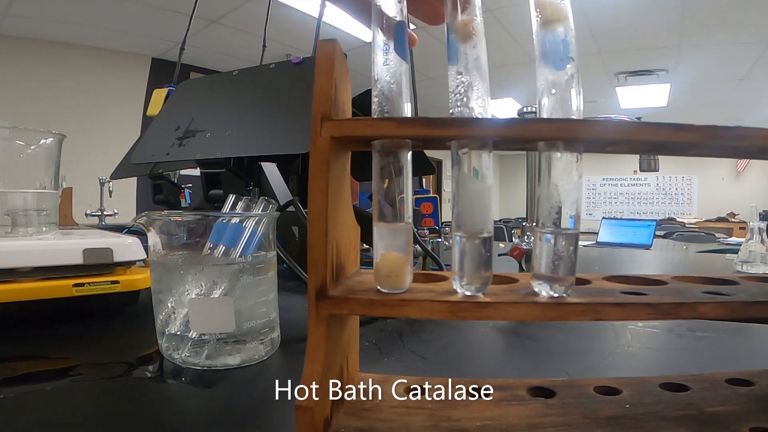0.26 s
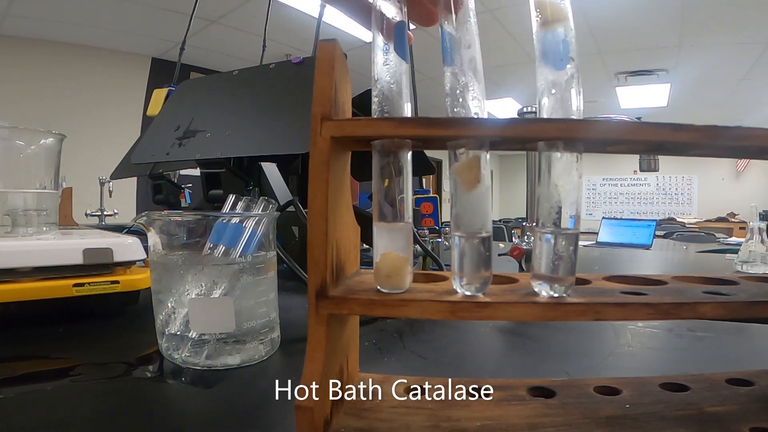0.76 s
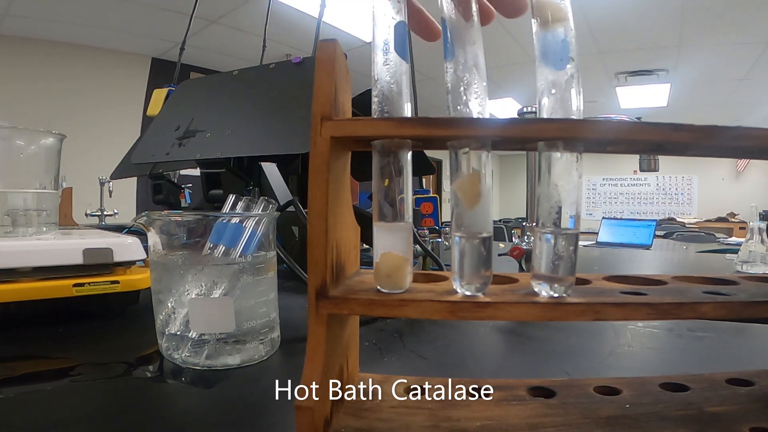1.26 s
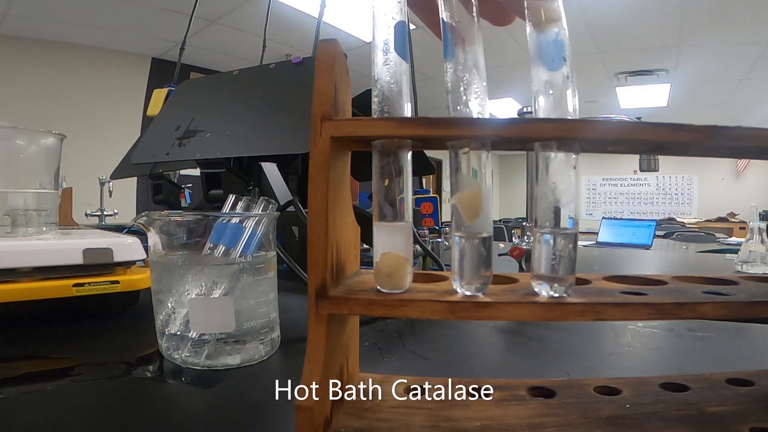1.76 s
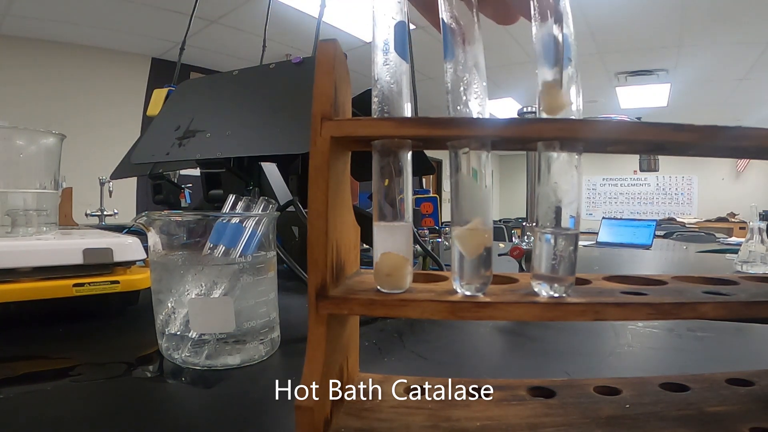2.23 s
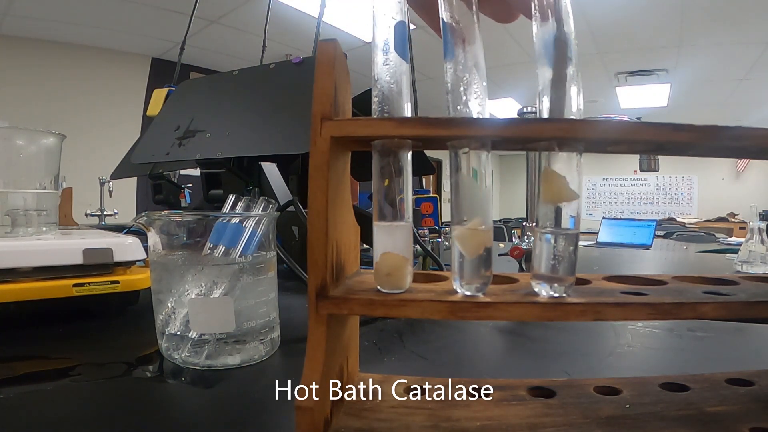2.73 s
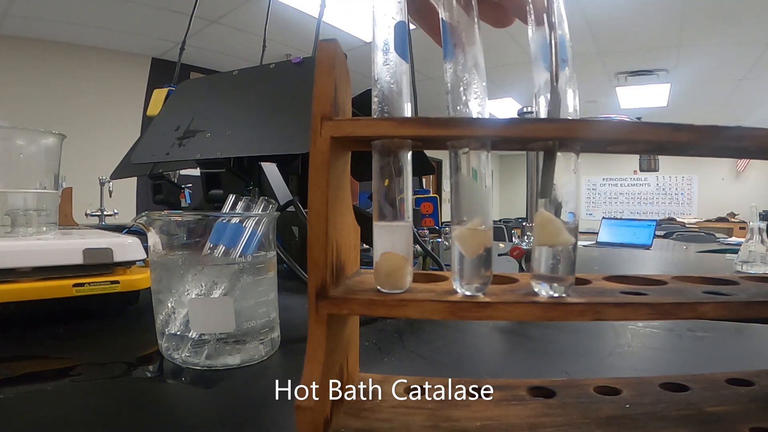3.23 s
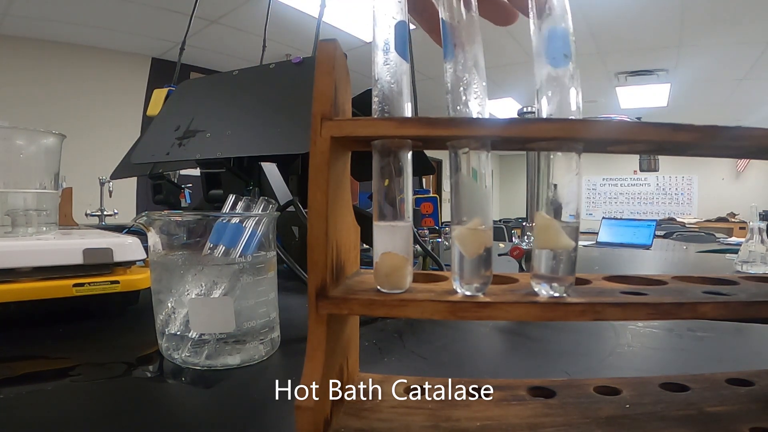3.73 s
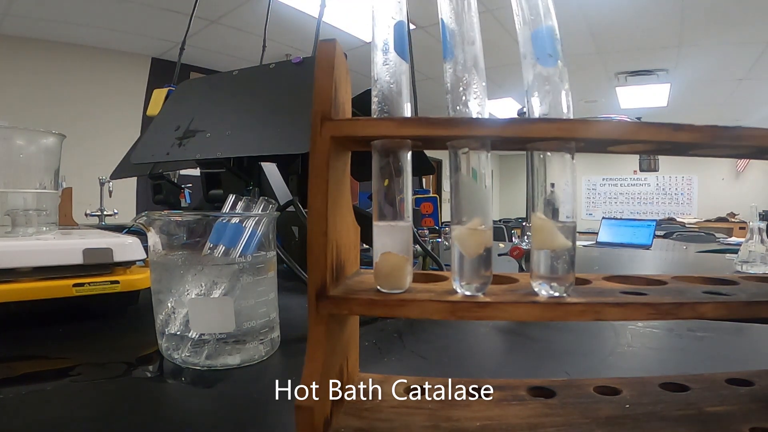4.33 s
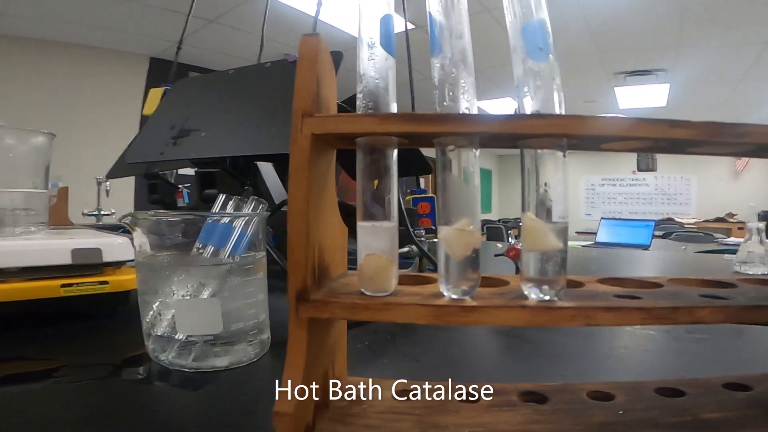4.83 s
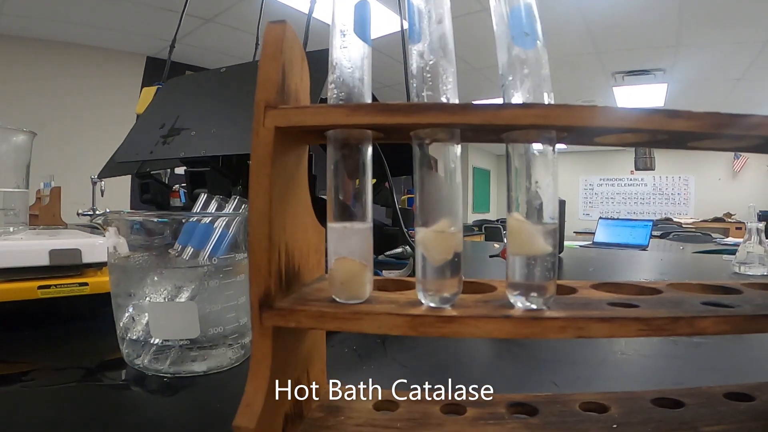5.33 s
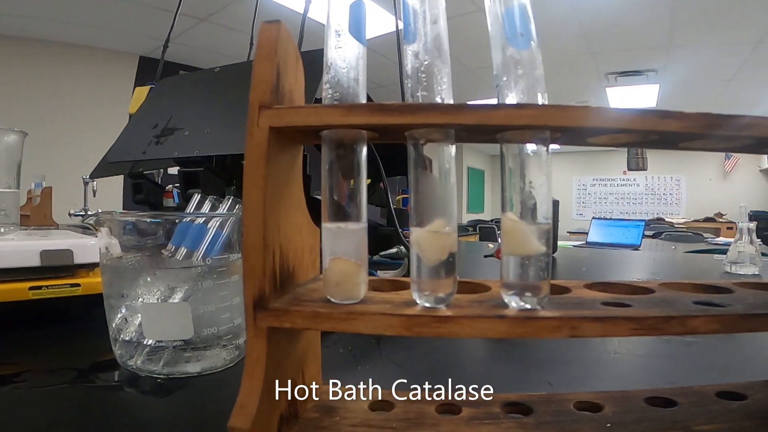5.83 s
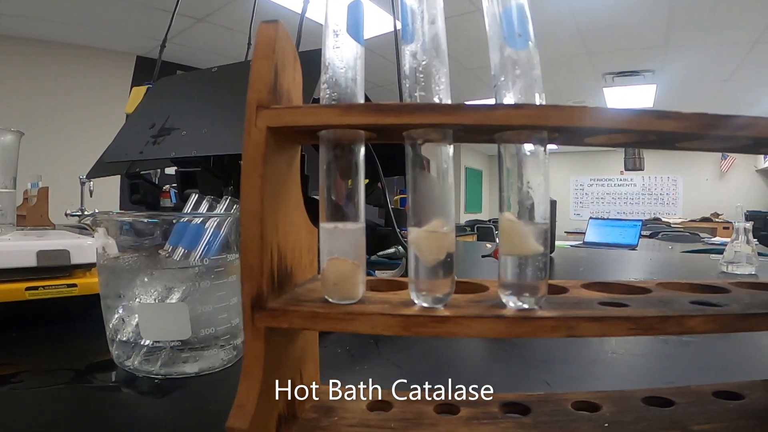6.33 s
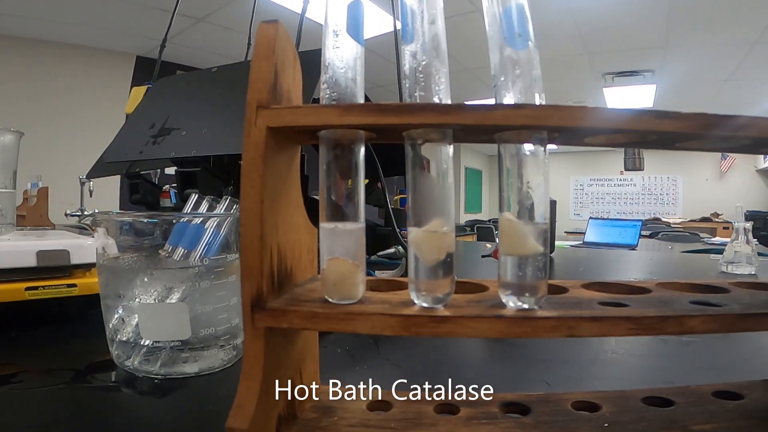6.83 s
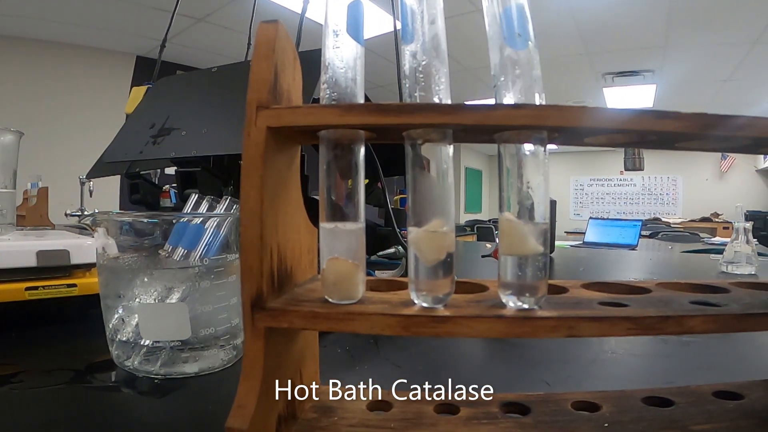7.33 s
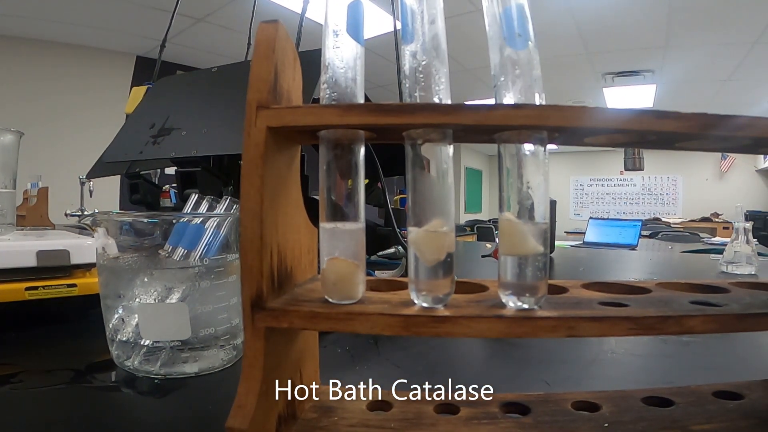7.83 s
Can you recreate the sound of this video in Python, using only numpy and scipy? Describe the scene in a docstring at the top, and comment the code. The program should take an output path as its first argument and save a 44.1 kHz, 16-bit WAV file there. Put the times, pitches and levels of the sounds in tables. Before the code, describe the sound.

Over the low, steady ventilation hum of a quiet classroom, a glass rod taps and scrapes in test tubes near the microphone, with a few louder knocks of a tube against its wooden rack. Past the middle, the microphone's stand judders briefly across the bench and thumps to a stop. The sound narrows to almost mono as the rod settles on the bench with light, ringing taps.

```python
"""A rod clicks and scrapes inside glass test tubes as it pushes small pieces down.
Each touch makes the glass ring briefly, and a tube knocks in its seat in the wooden rack.
The microphone's stand is shoved over the bench and the stereo image closes up; then the rod
is laid down, bouncing with a thin ring. Ventilation hums in the quiet classroom throughout."""
import sys
import numpy as np
from scipy import signal
from scipy.fft import rfft, irfft, next_fast_len
from scipy.io import wavfile

SR = 44100
rng = np.random.default_rng(int(sys.argv[2]) if len(sys.argv) > 2 else 0)


def file_out(sig):
    """Save sig as 16-bit WAV at sys.argv[1]."""
    # one column per channel
    cols = np.atleast_2d(sig).T
    # limit, then scale
    lim = np.clip(cols, -1, 1)
    pcm = np.round(lim * 32767).astype(np.int16)
    wavfile.write(sys.argv[1], SR, pcm)


N = 356328
TIME = np.arange(N) / SR
FIRM_CLICK_DB = -35

# The rod hits a held tube. Each row: start in seconds, level in dB, hardness in dB, favoured pitch in Hz.
ROD_CLICKS = [(0.22, -53, 10, 4330), (0.2952, -26.0, -1.5, 4280), (0.3844, -32.5, 1.5, 4740),
              (0.501, -55, -5, 4600), (0.548, -40.5, -4.5, 3020), (0.6453, -32, 8, 4300),
              (0.687, -36.5, 4, 3630), (0.7332, -27.0, -3.5, 3350), (0.744, -23.5, 3, 4700),
              (0.7962, -35.5, -12, 3360), (0.802, -39, 9, 4230), (0.92, -37, -4, 2800),
              (0.964, -34, 0.5, 3840), (0.978, -35, 2, 4100), (2.0997, -30, 0.5, 4470),
              (2.136, -38.5, -2, 4400), (2.1653, -29, 2, 4000), (2.2677, -26, -1, 3710),
              (2.2922, -25, 2, 4100), (2.3858, -36, -1, 3350), (2.899, -44, 2, 3740),
              (2.9561, -30, 5, 2990), (3.1838, -29, 4, 4650), (3.1984, -32, 8, 4370),
              (3.2492, -24.5, -4.5, 4660), (3.5508, -35, -5, 3320), (3.569, -30.5, -2, 3020),
              (3.8412, -32, -2.5, 4200), (3.872, -35.5, 10, 4300), (3.933, -40.5, -14, 4000),
              (3.9789, -26.5, 6, 3890), (4.6087, -46, -16, 1700), (4.6954, -39, 3, 6100)]
# The rod rubs down the glass. Each row: start and length in seconds, relative level in dB,
# added treble in dB, squeak pitch in Hz.
ROD_RUBS = [(0.75, 0.1, -62.5, 3.5, 4700), (0.926, 0.12, -57, 12.5, 3880), (2.303, 0.35, -60.5, -31, 3010),
            (2.712, 0.12, -52, -23, 3050), (2.861, 0.14, -54.5, 0, 3480), (3.253, 0.081, -48, -7, 3000),
            (3.619, 0.054, -58, -35, 2900), (3.732, 0.075, -44.5, 2, 2920), (3.842, 0.073, -48, 6, 2805),
            (3.92, 0.057, -44.5, 4, 3930)]
# The free rod's modes, the tones it rings with. Each row: pitch in Hz, relative level in dB,
# ring time in seconds (t60, the time to fade by 60 dB).
ROD_MODES = [(5890, -3.5, 0.26), (6600, -6, 0.15), (8210, -2.5, 0.13), (8500, -9, 0.092),
             (10180, -5.5, 0.2), (12200, -12.5, 0.2), (14200, -14, 0.14)]
# The bench top's modes. Each row: pitch in Hz, relative level in dB, ring time in seconds.
BENCH_MODES = [(614, -12, 0.054), (930, -6, 0.017), (2190, 0.5, 0.0081), (3470, -3, 0.0068)]


def from_db(db):
    """Turn decibels into a factor to multiply by."""
    return 10 ** (np.asarray(db) / 20)


def rms_one(x):
    """Scale a sound to an average strength (rms) of 1."""
    return x / np.sqrt(np.mean(x ** 2) + 1e-20)


def at_hz(curve, hz):
    """Read a curve between its listed frequencies."""
    known_hz, values = np.transpose(curve)
    return np.interp(np.log(hz + 1e-9), np.log(known_hz), values)


def add(out, s, sound):
    """Mix a sound in, starting at s seconds."""
    start = int(np.clip(round(s * SR), 0, N - 1))
    out[start:start + len(sound)] += sound[:N - start]


def shaped(x, curve, share=1):
    """Filter a sound by a share of a curve of dB against Hz."""
    size = next_fast_len(N)
    gain = from_db(share * at_hz(curve, np.fft.rfftfreq(size, 1 / SR)))
    return irfft(rfft(x, size) * gain, size)[..., :N]


def coloured(x, spectrum):
    """Give a noise its tone colour, falling steeply past both ends, at strength 1."""
    size = next_fast_len(N)
    hz = np.fft.rfftfreq(size, 1 / SR) + 0.00068
    ends = np.minimum(1, hz / spectrum[0][0]) ** 4 * np.minimum(1, spectrum[-1][0] / hz) ** 4
    return rms_one(irfft(rfft(x, size) * from_db(at_hz(spectrum, hz)) * ends, size)[..., :N])


def leaning(pair, balance):
    """Tip each frequency to the left or right."""
    return shaped(pair, balance, share=np.array([[.5], [-.5]]))


def resonance(x, hz, width_hz):
    """Keep what lies around one pitch."""
    return signal.lfilter(*signal.iirpeak(hz, hz / width_hz, fs=SR), x)


def radiated(x):
    """Thin tubes give off no bass."""
    return signal.sosfilt(signal.butter(2, 1100, "high", fs=SR, output="sos"), x)


def drift(per_s):
    """Wander to a new random value per_s times a second."""
    values = rng.standard_normal(N // 20)
    return np.interp(TIME * per_s, np.arange(len(values)), values)


def stroke(s, length, edge=.25):
    """A push swells, holds and lets go; rise and fall each take the share given by edge."""
    out = np.zeros(N)
    progress = TIME[:int(length * SR)] / length
    ramp = np.clip(np.minimum(progress, 1 - progress) / edge, 0, 1)
    add(out, s, np.sin(np.pi / 2 * ramp))
    return out


def crackle(spectrum, per_s, spread_db, cycles, clump_db, bands=22):
    """Tiny slips of uneven size come in clumps; each rings for a few cycles at its own pitch."""
    sizes = from_db(spread_db * np.minimum(rng.exponential(1, N), 4)) * rng.choice([-1, 1], N)
    slips = sizes * (rng.random(N) < per_s / SR) * from_db(clump_db * drift(110))
    band_of_slip = rng.integers(0, bands, N)
    out = 0
    for k, hz in enumerate(np.geomspace(spectrum[0][0], spectrum[-1][0], bands)):
        out += resonance(slips * (band_of_slip == k) + 1e-18, hz, hz / cycles)
    return coloured(out, spectrum)


def strike(modes, vary_db, detune, tilt_db=0):
    """One blow: the point of contact gives every mode its own strength, sign and slight mistuning."""
    hz, db, t60 = np.transpose(modes)
    t = TIME[:int(1.5 * SR * t60.max())]
    strength, sign, mistuning = rng.standard_normal((3, len(hz)))
    gain = from_db(db + vary_db * strength)
    gain = gain / np.linalg.norm(gain) * np.sign(sign) * from_db(tilt_db)
    tones = np.sin(2 * np.pi * np.outer(hz * (1 + detune * mistuning), t))
    fades = 1000. ** -np.outer(1 / t60, t)
    return gain @ (tones * fades)


def ventilation():
    """Air rumbles in the ducts and hisses softly while a motor hums and wavers."""
    # Tone colours of the moving air. Each row: frequency in Hz, relative level in dB.
    rumble_colour = [(22, -1.5), (80, -3.5), (112, 5), (160, -4.5), (200, -2), (330, -8.5), (450, -15.5),
                     (650, -20.5), (900, -42.5)]
    hiss_colour = [(750, -19), (900, -9), (1180, -3), (1600, -4), (2970, -13.5), (3490, -10), (4190, -19.5),
                   (5500, -21.5), (8330, -27.5), (15000, -51.5)]
    # Stereo width, least in the bass. Each row: frequency in Hz, side level over centre level in dB.
    air_width = [(60, -30), (250, -18.5), (1600, -2.5), (10000, 1.5)]
    # The air's lean. Each row: frequency in Hz, left over right in dB.
    air_balance = [(200, 0), (1600, 5.5), (4000, 6), (10000, 0)]
    # The motor's tones. Each row: pitch in Hz, level in dB.
    motor_tones = [(119, -50.5), (203, -55), (241, -56), (479, -63)]
    out = np.zeros((2, N))
    for db, colour in (-41.5, rumble_colour), (-60.5, hiss_colour):
        centre, side = rng.standard_normal((2, N))
        air = leaning(centre + shaped(side, air_width) * [[1], [-1]], air_balance)
        out += from_db(db) * coloured(air, colour)
    for hz, db in motor_tones:
        level = from_db(db + 0.67 * drift(19)) * np.sqrt(2)
        out += level * np.sin(2 * np.pi * hz * TIME + 0.99 * drift(6))
    return out


def whine(hz=8000, db=-83, pulses_per_s=17.37, pulse_s=.016):
    """A faint high tone pulses quickly, as from some electronics."""
    progress = (TIME * pulses_per_s % 1) / (pulses_per_s * pulse_s)
    pulses = np.sin(np.pi * np.minimum(progress, 1))
    tone = np.sin(2 * np.pi * hz * TIME + 2 * drift(400))
    return from_db(db) * np.sqrt(2) * pulses * tone


def tube_clicks(events, focus_db=6, focus_octaves=0.23, bounce_db=-6):
    """The rod hits the glass: soft touches stir the low modes, hard ones the high modes."""
    # The tube wall, damped by fingers. Each row: pitch in Hz, relative level in dB, ring time in seconds.
    tube_modes = [(1700, -2, 0.025), (2137, -1.5, 0.02), (2985, -5, 0.032), (3340, -4.5, 0.0197),
                  (3840, -7.5, 0.018), (4100, 1, 0.011), (4650, 4, 0.013), (5453, -3, 0.026),
                  (6170, -5, 0.019), (7200, -1, 0.0078), (8760, -4.5, 0.0105), (10330, -7, 0.018),
                  (12700, -13.5, 0.014)]
    hz, mode_db, t60 = np.transpose(tube_modes)
    out = np.zeros(N)
    for s, db, hardness, focus_hz in events:
        lightness_db = 0.28 * (FIRM_CLICK_DB - db)   # lighter clicks favour both ends of the range
        low_db = -3.5 + lightness_db - hardness
        high_db = 4 + lightness_db + hardness
        tilt = at_hz([(2000, low_db), (3000, 0), (5500, 0), (11500, high_db)], hz)
        # Modes near the favoured pitch grow louder and are drawn towards it.
        near = np.exp(-(np.log2(hz / focus_hz) / focus_octaves) ** 2)
        favoured = np.transpose([hz + (focus_hz - hz) * near / 2, mode_db + focus_db * near, t60])
        click = np.zeros(SR // 2)
        bounce_times = np.cumsum(rng.uniform(.0006, .002, 2))
        for k, delay in enumerate([0, *bounce_times]):
            ring = strike(favoured, vary_db=2.5, detune=0.047, tilt_db=tilt)
            add(click, delay, from_db(k * bounce_db) * ring)
        # Set the level as if all the click's energy fell within 10 ms.
        add(out, s, from_db(db) * click / np.linalg.norm(click) * np.sqrt(SR / 100))
    return radiated(out)


def rubbing(ring_db=9, skid_t60=0.16):
    """The wet rod sticks and slips on the glass, in a skid after each click and in squeaky strokes."""
    # Tone colours of the rub, and of the treble a dry, hard rub adds.
    # Each row: frequency in Hz, relative level in dB.
    rub_colour = [(750, -5.5), (1200, -3.5), (2000, -8), (3000, -7), (6700, -11.5), (15000, -33)]
    hiss_colour = [(3000, -26), (8000, -3.5), (10600, 7.5), (15000, -2)]
    # The tube's resonances under the sliding rod. Each row: pitch in Hz, width in Hz.
    tube_rings = [(2250, 100), (3380, 150), (4300, 240)]
    slips = crackle(rub_colour, per_s=8000, spread_db=3, cycles=18, clump_db=2.5)
    ringing = sum(resonance(slips, hz, width) for hz, width in tube_rings)
    scrape = rms_one(slips + from_db(ring_db) * ringing)
    treble = shaped(scrape, hiss_colour)
    skids = np.zeros(N)
    for s, db, *_ in ROD_CLICKS:
        skid_db = -52.5 + 0.4 * (db - FIRM_CLICK_DB)   # firmer clicks skid louder
        add(skids, s, from_db(skid_db - 60 * TIME[:SR // 2] / skid_t60))
    out = skids * scrape
    for s, length, db, treble_db, hz in ROD_RUBS:
        squeak = from_db(-0.5) * rms_one(resonance(slips, hz, width_hz=150))
        out += from_db(db) * stroke(s, length, edge=.27) * (scrape + squeak + from_db(treble_db) * treble)
    return out


def pings():
    """Single tones ring on after some blows: tube clinks, the stand's knock and the rod's landing."""
    # Each row: start in seconds, level in dB, pitch in Hz, ring time in seconds.
    lone_tones = [(0.745, -20.5, 12200, 0.028), (3.9781, -17, 3936, 0.073), (3.9787, -49, 6610, 0.25),
                  (5.031, -23.5, 800, 0.05), (5.702, -39, 9297, 0.24), (5.703, -37, 12200, 0.14),
                  (6.448, -42, 5370, 0.15)]
    out = np.zeros(N)
    for s, db, hz, t60 in lone_tones:
        add(out, s, from_db(db) * strike([(hz, 0, t60)], vary_db=0, detune=0))
    return out


def catches(per_s=36):
    """List small clicks where the rubbing rod catches at random; they follow the rub's level and treble."""
    return [(s + length * rng.uniform(.1, .9), db + 1.5 + rng.normal(0, 2), treble_db / 2, hz)
            for s, length, db, treble_db, hz in ROD_RUBS for _ in range(int(length * per_s))]


def seat_knocks(grip_after_s=0.00534, grip_t60=0.026, bounce_db=-11, thump_db=-8):
    """A tube chatters and rings for a few milliseconds, then the wooden rack grips it with a thump."""
    # The tube's knocks. Each row: start in seconds, level in dB, hardness in dB.
    knocks = [(1.482, -16.5, 8), (1.8215, -21.5, -1), (1.9621, -14.5, -0.5)]
    # Modes of the seated tube and of the rack.
    # Each row: pitch in Hz, relative level in dB, ring time in seconds.
    seat_modes = [(1600, -1, 0.12), (1642, -6.5, 0.038), (2156, -6.5, 0.13), (3000, -12.5, 0.013),
                  (3710, -8, 0.015), (4200, 3.5, 0.0063), (4700, -7.5, 0.0058), (6830, -2.5, 0.0014)]
    rack_modes = [(240, -2, 0.038), (540, -4, 0.024)]
    glass, wood = np.zeros((2, N))
    for s, db, hardness in knocks:
        tilt = at_hz([(2000, -hardness / 2), (4000, hardness / 2)], np.transpose(seat_modes)[0])
        bounce_times = np.cumsum(rng.uniform(.001, .0022, 3))
        for k, delay in enumerate([0, *bounce_times]):
            ring = strike(seat_modes, vary_db=1, detune=.07 if k else .005, tilt_db=tilt)
            gripped_s = np.maximum(0, TIME[:len(ring)] + delay - grip_after_s)
            add(glass, s + delay, from_db(db + bounce_db * (k > 0) - 60 * gripped_s / grip_t60) * ring)
        add(wood, s + grip_after_s, from_db(db + thump_db) * strike(rack_modes, vary_db=1, detune=0.067))
    return radiated(glass) + wood


def bench_noises():
    """Grit crunches in fits, and the bench rumbles under it."""
    # Their tone colours. Each row: frequency in Hz, relative level in dB.
    grit_colour = [(450, -26), (600, 2), (900, 5.5), (1500, 1), (3100, -4.5), (4500, -13), (8300, -20.5),
                   (15000, -35)]
    rumble_colour = [(70, -0.5), (110, 1.5), (200, -2), (450, -17)]
    grit = crackle(grit_colour, per_s=18000, spread_db=2.8, cycles=9, clump_db=2.8)
    return grit, coloured(rng.standard_normal(N), rumble_colour)


def sliding(grit, rumble):
    """Things are dragged over rack and bench in short pushes."""
    # Each row: start and length in seconds, grit level in dB, rumble level in dB.
    drags = [(3.532, 0.34, -60, -44), (5.662, 0.074, -52, -42.5), (6.41, 0.11, -43.5, -38.5),
             (6.72, 0.11, -56.5, -64)]
    return sum((from_db(grit_db) * grit + from_db(rumble_db) * rumble) * stroke(s, length)
               for s, length, grit_db, rumble_db in drags)


def shoved_stand(noises, shake_db=4, crosstalk=0.17, judder_db=1.5):
    """The stand judders over the bench to a stop, shaking each side of the microphone mostly on its own."""
    # The course of the shove. Each row: time in seconds, grit level in dB, rumble level in dB.
    shove = [(4.925, -63, -60.5), (4.955, -45, -30), (4.975, -28.5, -30), (5.015, -39, -28.5),
             (5.04, -41, -27.5), (5.075, -37, -37.5), (5.225, -40, -39), (5.275, -78, -60)]
    # The shaking stand's tone colour. Each row: frequency in Hz, relative level in dB.
    shake_colour = [(22, -5), (50, 11), (90, -3)]
    # The shove's lean. Each row: frequency in Hz, left over right in dB.
    balance = [(60, 2.5), (250, -8.5), (1600, -4.5), (4000, 0.5)]
    s, grit_db, rumble_db = np.transpose(shove)
    grit_level = from_db(np.interp(TIME, s, grit_db, left=-np.inf, right=-np.inf))
    grit_level *= from_db(judder_db * drift(160))
    rumble_level = from_db(np.interp(TIME, s, rumble_db, left=-np.inf, right=-np.inf))
    pair = np.zeros((2, N))
    for side, (grit, rumble) in enumerate(noises):
        shake = from_db(shake_db) * coloured(rng.standard_normal(N), shake_colour)
        pair[side] = grit_level * grit + rumble_level * (rumble + shake)
    return leaning(pair + crosstalk * pair[::-1], balance)


def rocking_stand():
    """The jolted stand rocks and drops back on its feet: the bench knocks and the stand thumps."""
    # Each row: start in seconds, bench knock in dB, stand thump in dB.
    jolts = [(4.975, -37, -20.5), (5.0271, -20.5, -23), (5.035, -47, -19)]
    # The stand's modes. Each row: pitch in Hz, relative level in dB, ring time in seconds.
    stand_modes = [(94.5, -2, .06), (189, 1, 0.11)]
    knocks, thumps = np.zeros((2, N))
    for s, knock_db, thump_db in jolts:
        add(knocks, s, from_db(knock_db) * strike(BENCH_MODES, vary_db=2, detune=0.088))
        add(thumps, s, from_db(thump_db) * strike(stand_modes, vary_db=1, detune=0.017))
    return knocks, thumps


def rod_scraping(flutter_db=2.5):
    """The glass rod's end hisses over fine grit on the bench, which keeps its modes ringing faintly."""
    # Each row: start and length in seconds, level in dB.
    scrapes = [(5.625, 0.22, -73.5), (6.131, .12, -70), (6.36, 0.24, -66)]
    # The hiss's tone colour. Each row: frequency in Hz, relative level in dB.
    hiss_colour = [(6000, 1), (14000, -13)]
    hiss = coloured(rng.standard_normal(N) * from_db(flutter_db * drift(110)), hiss_colour)
    ringing = rms_one(sum(from_db(db) * resonance(hiss, hz, width_hz=60) for hz, db, _ in ROD_MODES))
    return (hiss + ringing / 2) * sum(from_db(db) * stroke(s, length) for s, length, db in scrapes)


def rod_landing(first_gap_s=0.0095, gap_shrink=0.83, rod_loss_db=6, thud_loss_db=4.5):
    """The rod lands and bounces; each touch is a thin ring, a dry tick and a thud of the bench."""
    # Each row: start in seconds, relative levels of rod and thud in dB, share of the free ring time.
    landings = [(5.7014, -36.5, -48, 1), (6.0235, -54, -35, .4), (6.041, -48.5, -32, 0.33),
                (6.386, -39.5, -25, 0.88), (6.4145, -50, -30, .5), (6.4305, -41, -17.5, 0.5),
                (6.449, -40.5, -18.5, 1), (6.5207, -49, -27, 0.49), (6.746, -58, -37.5, .3)]
    out = np.zeros(N)
    tick_modes = [(hz, db, .006) for hz, db, _ in ROD_MODES]
    for s, rod_db, thud_db, freedom in landings:
        ring_modes = [(hz, db, t60 * freedom) for hz, db, t60 in ROD_MODES]
        gaps = first_gap_s * gap_shrink ** np.arange(4) * rng.uniform(.85, 1.15, 4)
        for k, moment in enumerate(s + np.cumsum([0, *gaps])):
            # Each new contact loads the rod a little differently and mistunes its ring.
            ring = from_db(-5.5) * strike(ring_modes, vary_db=2, detune=.001 + .004 * k)
            tick = from_db(-2) * strike(tick_modes, vary_db=2, detune=0.046)
            thud = from_db(-7) * strike(BENCH_MODES, vary_db=2, detune=0.048)
            rod_level = from_db(rod_db - k * rod_loss_db)
            add(out, moment, rod_level * ring)
            add(out, moment, rod_level * tick)
            add(out, moment, from_db(thud_db - k * thud_loss_db) * thud)
    return out


def classroom(x, near_db, near_t60, tail_db):
    """Quick echoes from rack and bench, then a weak wash from the room that dies sooner in the treble."""
    # The room's echo. Each row: frequency in Hz, ring time in seconds.
    room_t60 = [(6000, 0.47), (15000, 0.3)]
    t = TIME[:SR * 2 // 3]
    edges_hz = np.geomspace(150, 16000, 9)
    tail = 0
    for low, high in zip(edges_hz, edges_hz[1:]):
        band_filter = signal.butter(2, [low, high], "band", fs=SR, output="sos")
        band = signal.sosfilt(band_filter, rng.standard_normal((2, len(t))))
        tail += band * from_db(-60 * t / at_hz(room_t60, np.sqrt(low * high)))
    near = rng.standard_normal((2, len(t))) * from_db(-60 * t / near_t60) * (t > .0012)
    echo = from_db(near_db) * rms_one(near) + from_db(tail_db) * rms_one(tail * (t > .009))
    return signal.fftconvolve(x[None], echo / np.sqrt(len(t)), axes=1)[:, :N]


def from_the_right(x, lag_samples=2.04):
    """The microphone's left side hears the rack a little later and duller."""
    # Treble lost on the far side. Each row: frequency in Hz, level change in dB.
    far_side = [(4400, -0.5), (8100, -3.5), (12500, -27.5)]
    size = next_fast_len(N)
    hz = np.fft.rfftfreq(size, 1 / SR)
    delay = np.exp(-2j * np.pi * hz * lag_samples / SR)
    left = irfft(rfft(x, size) * from_db(at_hz(far_side, hz)) * delay, size)
    return np.array([left[:N], x])


def scene():
    """Glass close by on the right, the bench straight ahead, ventilation all around."""
    background = ventilation() + whine()
    noises = bench_noises(), bench_noises()
    dragging = sliding(*noises[0]) + shoved_stand(noises)
    stand_knocks, stand_thumps = rocking_stand()
    bench = stand_knocks + rod_landing()
    # The bench is struck farther off, with more echo; it sounds the same on both sides.
    bench += classroom(bench, near_db=-4, near_t60=0.034, tail_db=-13)[0]
    glass = tube_clicks(ROD_CLICKS + catches()) + from_db(2) * rubbing() + seat_knocks()
    room = classroom(glass, near_db=-13, near_t60=0.044, tail_db=-23.5)
    glass += pings()
    add(glass, .0215, from_db(-29) * glass)   # echo from the ceiling
    return from_the_right(glass) + bench + room + dragging + rod_scraping() + stand_thumps + background


def record(dry, cutoff_hz=16000):
    """The stereo image closes up after the shove and partly reopens; the highest treble is cut steeply."""
    # Stereo width. Each row: time in seconds, change of the side level in dB.
    width = [(5.27, -6), (5.7, -35), (6.6, -38.5), (8.0, -7.5)]
    centre = dry.mean(axis=0)
    side_gain = from_db(np.interp(TIME, *np.transpose(width), left=0))
    narrowed = centre + (dry - centre) * side_gain
    return signal.sosfilt(signal.ellip(10, .2, 80, cutoff_hz, fs=SR, output="sos"), narrowed)


dry = scene()
out = record(dry)
file_out(out)
```